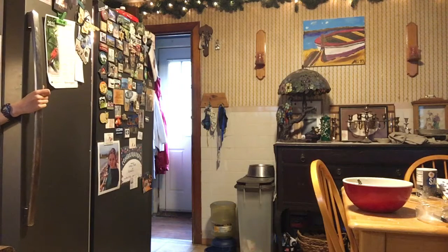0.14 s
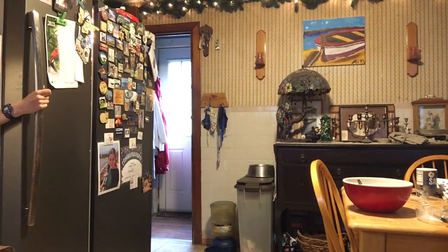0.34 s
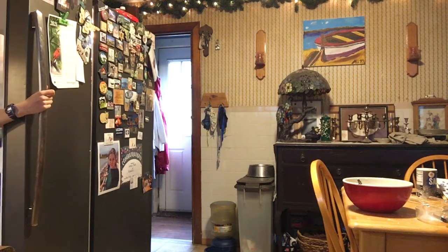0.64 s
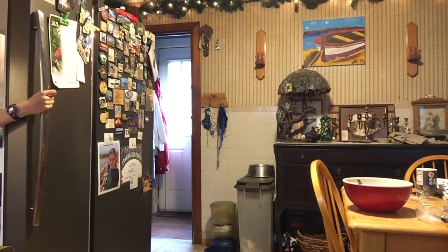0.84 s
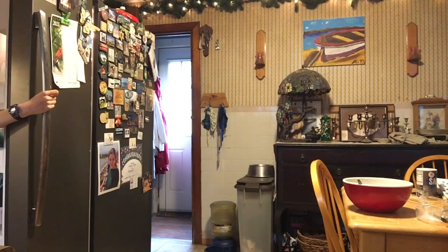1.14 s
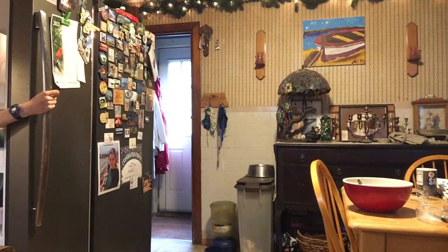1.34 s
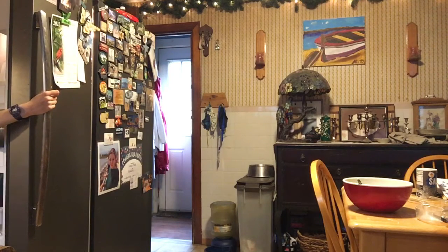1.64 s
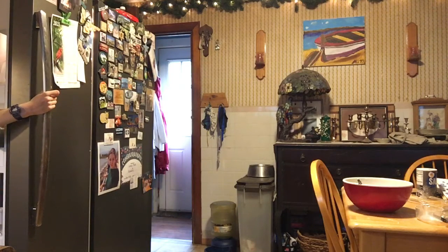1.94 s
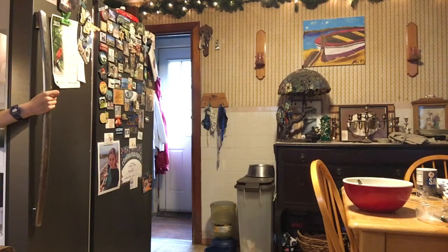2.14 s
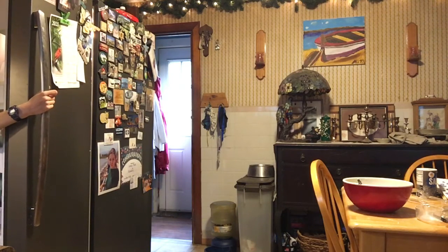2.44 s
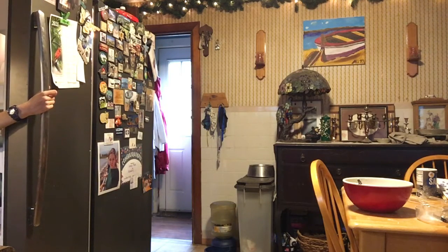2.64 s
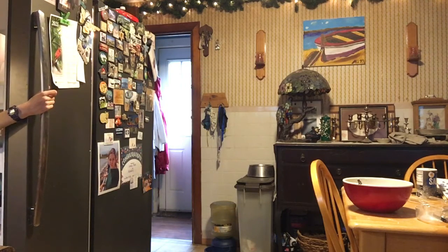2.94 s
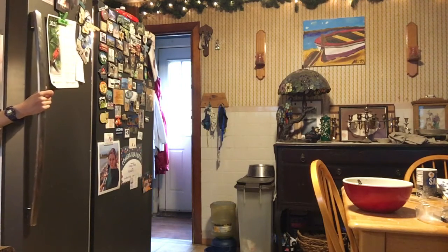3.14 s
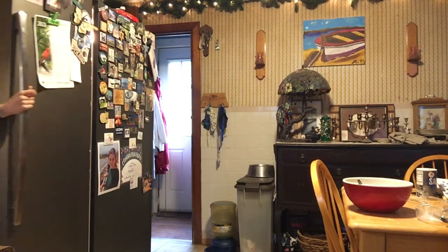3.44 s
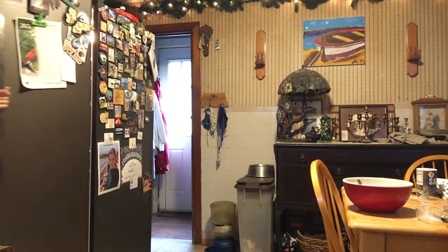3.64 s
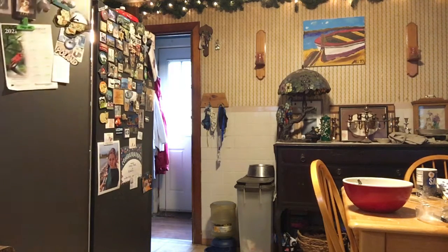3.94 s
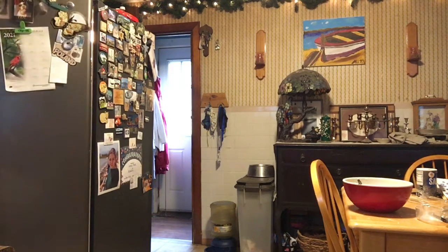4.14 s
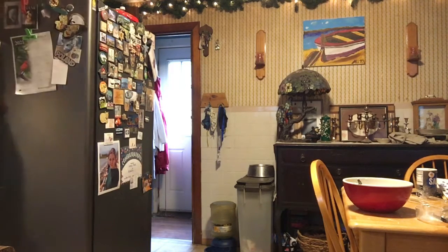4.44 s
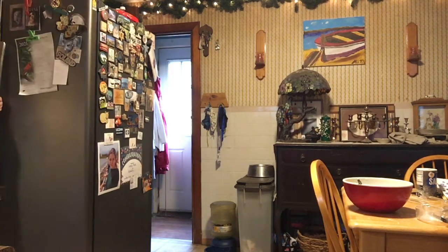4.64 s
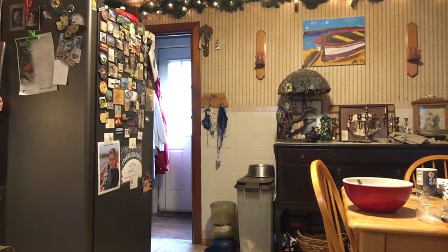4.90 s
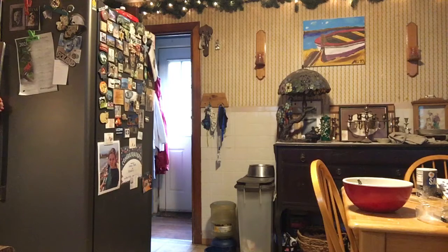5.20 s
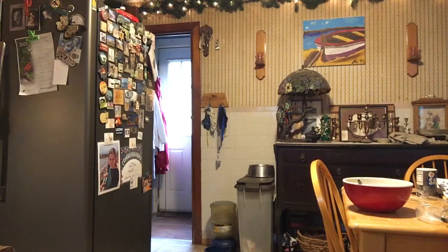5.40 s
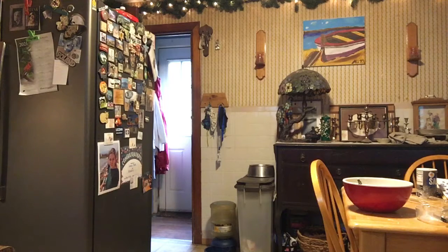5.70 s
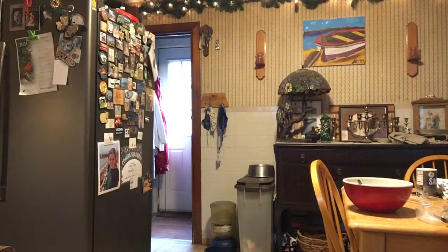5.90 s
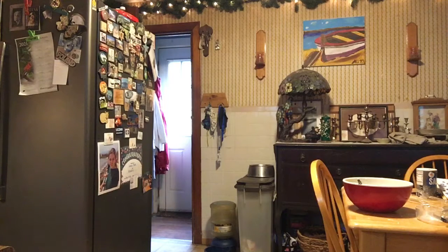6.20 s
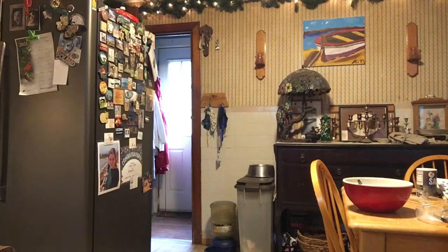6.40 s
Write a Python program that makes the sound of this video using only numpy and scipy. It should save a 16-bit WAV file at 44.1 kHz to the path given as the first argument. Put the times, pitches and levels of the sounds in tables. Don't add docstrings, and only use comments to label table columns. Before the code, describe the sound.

Over a low steady compressor hum, dry hand rubbing and muffled bumps lead to a seal pop, heavy door thumps, and a deep closing thud.

```python
import sys
import numpy as np
from scipy import signal
from scipy.fft import rfft, irfft
from scipy.io import wavfile
from scipy.ndimage import uniform_filter1d, map_coordinates

SR = 44100
rng = np.random.default_rng(int(sys.argv[2]) if len(sys.argv) > 2 else 0)


def magnitude_from_level(level_db):
    exponent = np.asarray(level_db, float) / 20
    return 10 ** exponent


def int16_out(signal):
    q = np.round(np.clip(np.atleast_2d(signal).T, -1, 1) * 32767)
    wavfile.write(sys.argv[1], SR, q.astype(np.int16))


N = 289296


def evened(x):
    return x / np.sqrt(np.mean(x ** 2) + 1e-20)


def filtered(x, order, hz, kind="lowpass"):
    return signal.sosfilt(signal.butter(order, hz, kind, fs=SR, output="sos"), x)


def coloured(x, points):
    f, db = np.transpose(points)
    hz = np.fft.rfftfreq(len(x), 1 / SR)
    gain = magnitude_from_level(np.interp(np.log(hz + 1), np.log(f + 1), db))
    return evened(irfft(rfft(x) * gain, len(x)))


def resonate(x, hz, width_hz):
    return signal.lfilter(*signal.iirpeak(hz, hz / width_hz, SR), x)


def ringing(clicks, hz, width_hz, level_db):
    return magnitude_from_level(level_db) * SR / (2 * np.pi * width_hz) * resonate(clicks, hz, width_hz)


def drift(per_s):
    points = rng.standard_normal(int(N / SR * per_s) + 3)
    coarse = map_coordinates(points, [np.linspace(0, len(points) - 1, N // 32)], order=3)
    return np.interp(np.arange(N), np.linspace(0, N - 1, len(coarse)), evened(coarse))


def modal(x, modes):
    parts = [magnitude_from_level(db + 2 * drift(18)) * evened(resonate(x, hz, width_hz)) for hz, width_hz, db in modes]
    return evened(sum(parts))


def add(mix, start_s, sound):
    part = mix[round(start_s * SR):][:len(sound)]
    part += sound[:len(part)]


# pitch_hz, width_hz, level_db
SKIN_MODES = [(496.5, 6.3, -14), (566.5, 38, 2), (647, 54, 1), (791, 124, 4), (885, 53, -3), (1083, 140, 0),
              (1236, 85, 1), (1364, 68, -12.5), (1527, 57, -4.5), (1736, 190, -2.5), (2050, 130, -24)]
# pitch_hz, width_hz, level_db
PANEL_MODES = [(143.2, 24, 2.5), (171.6, 23.5, 4), (238, 28, 1), (280.6, 9.1, -3.5), (335, 17, -10),
               (374.4, 8.3, -9)]
# pitch_hz, width_hz, level_db
FIZZ_MODES = [(2270, 1150, 0), (2870, 570, 4), (3520, 400, 1.5), (3755, 120, 0.5), (4170, 350, -1),
              (5000, 990, -29)]
# pitch_hz, level_db per Hz
SIZZLE_SPECTRUM = [(2940, -35), (5000, -5), (6710, -0.5), (8460, -6), (9750, -13.5), (10500, -25),
                   (12300, -20), (15500, -33)]


def friction_layers():
    force = magnitude_from_level(1.4 * np.minimum(rng.exponential(1, N), 5))
    slips = force * rng.standard_normal(N) * (rng.random(N) < .3)
    slips = slips / np.sqrt(uniform_filter1d(slips ** 2, size=900) + 1e-9)

    body = evened(filtered(modal(slips, SKIN_MODES) + .5 * evened(slips), 2, [430, 2600], "bandpass"))
    lower = signal.sosfiltfilt(signal.butter(2, 1310, fs=SR, output="sos"), body)
    panel = evened(filtered(modal(slips, PANEL_MODES), 3, [115, 450], "bandpass"))

    fizz_slips = np.roll(slips, -SR) * rng.choice([-1, 1], N)
    fizz = evened(filtered(modal(fizz_slips, FIZZ_MODES), 3, [2100, 5100], "bandpass"))
    sizzle_slips = np.roll(slips, SR) * rng.choice([-1, 1], N)
    sizzle = coloured(sizzle_slips, SIZZLE_SPECTRUM) * magnitude_from_level(0.72 * drift(40))
    return np.array([lower, panel, fizz, sizzle, body - lower])


def effort_db(t, peak_s, level_db, swell_s, fade_s):
    return level_db - 20 * np.where(t < peak_s, (peak_s - t) / swell_s, (t - peak_s) / fade_s)


# fizz_db, sizzle_db, sheen_db.
SLIDE = [(.035, -54.5, .008, 0.24, 7.5), (.13, -57.5, 0.12, 0.09, -8), (.33, -49.5, 0.09, 0.1, -5.5),
         (.39, -48.5, 0.07, 0.04, -5.5), (.24, -57, .03, .2, -5), (.44, -53, 0.069, 0.09, -3),
         (.657, -49.5, 0.0072, 0.34, 0.5), (.86, -52, 0.17, 0.57, -7), (1.062, -49.5, .06, 0.18, -3.5),
         (1.21, -54, 0.13, 0.25, -14), (1.372, -52, 0.18, .1, -3), (1.428, -49, .04, 0.079, 2.5),
         (1.54, -61.5, 0.11, .3, -8), (1.698, -55.5, .12, 0.19, -3)]
SLIDE_COLOUR = (-4, -13, 1)
PRESS = [(.018, -47.5, 0.023, 0.053, 9), (.06, -53.5, .05, 0.056, 9.5), (.128, -54.5, .03, 0.13, -11),
         (.428, -49.5, 0.023, 0.027, -14), (.884, -46.5, .06, 0.12, -18), (1.004, -45, 0.075, 0.028, -6),
         (1.174, -53.5, .1, 0.14, -15), (1.292, -49.5, 0.056, 0.28, -8), (1.512, -57, 0.055, .06, -4),
         (1.6, -63.5, .02, .5, -2), (1.76, -57, 0.033, 0.053, 6), (1.846, -55.5, 0.095, 0.17, -8),
         (1.896, -58.5, 0.044, 0.083, 7)]
PRESS_COLOUR = (-14, -21, -4)
RASP = [
    (.085, -68, .06, .08, -9),
    (.155, -67.5, .06, .08, -9),
    (.21, -71, .01, .1, -9),
    (.31, -67, .08, .1, -9),
    (.355, -64, .06, .06, -9),
    (2.787, -58, .04, .025, -9),
]
RASP_COLOUR = (7, -9, 3)
PULL = [
    (2.378, -55, 0.037, 0.1, 6.5),
    (2.76, -42, 0.028, 0.085, 6),
    (3, -60, 0.087, .2, 1),
    (2.87, -57, 0.083, 0.29, 6.5),
    (4.452, -57, .02, .06, -8),
]
PULL_COLOUR = (-6.5, -19, 1)
CRACK = [
    (2.584, -35, .001, .06, -2),
    (2.603, -37, 0.015, .085, 2),
]
CRACK_COLOUR = (-16, -14, -2)
DOOR = [
    (2.65, -51, .04, 0.08, 9),
    (2.74, -51, 0.026, .03, 5.1),
    (2.946, -50, .15, .2, 3.3),
    (2.995, -52, 0.088, .05, 5),
    (3.012, -33, 0.01, 0.075, 2),
    (3.04, -33, 0.06, 0.068, 6),
    (3.066, -34.5, 0.066, 0.06, 5.3),
    (4.67, -45.5, 0.055, .1, 3.9),
]
DOOR_COLOUR = (-17, -28, -8)
SWING = [(3.45, -62, .05, .06, 7.5), (3.554, -56.5, 0.067, .09, -2), (3.745, -57.5, 0.059, 0.13, -7),
         (3.824, -57.5, .1, 0.053, -10), (4.02, -52, 0.036, 0.032, -9), (4.12, -54.5, 0.16, .05, 0),
         (4.29, -57.5, .04, 0.16, -3.5), (4.454, -46, 0.046, 0.025, -23), (4.47, -56, 0.018, 0.12, 2),
         (4.6, -66, .1, .02, 2), (6.2, -63, .02, .02, 6), (6.408, -65.5, 0.34, .1, -7)]
SWING_COLOUR = (-18.5, -32, -8.5)
SLAM = [
    (4.618, -29.5, .006, .055, -7),
]
SLAM_COLOUR = (-11, -21, -4)
BOUNCE = [
    (4.708, -39.5, 0.014, 0.047, 3.8),
    (4.73, -47.5, .03, 0.032, 5),
    (4.77, -66, .05, .12, 9.9),
    (6.54, -56, .006, .1, 3),
    (6.56, -47, .03, .05, 2),
]
BOUNCE_COLOUR = (-21, -28, -24)


def strokes(layers):
    t = np.arange(0, N / SR + 1e-3, 1e-3)
    power = np.zeros((5, len(t)))
    kinds = [(SLIDE, SLIDE_COLOUR), (PRESS, PRESS_COLOUR), (RASP, RASP_COLOUR), (PULL, PULL_COLOUR),
             (CRACK, CRACK_COLOUR), (DOOR, DOOR_COLOUR), (SWING, SWING_COLOUR), (SLAM, SLAM_COLOUR),
             (BOUNCE, BOUNCE_COLOUR)]
    for rows, (fizz_db, sizzle_db, sheen_db) in kinds:
        for peak_s, level_db, swell_s, fade_s, panel_db in rows:
            effort = magnitude_from_level(effort_db(t, peak_s, level_db, swell_s, fade_s))
            colour = magnitude_from_level(np.array([[0], [panel_db], [fizz_db], [sizzle_db], [sheen_db]]))
            power += (effort * colour) ** 2
    times = np.arange(N) / SR
    return sum(np.interp(times, t, np.sqrt(p)) * layer for p, layer in zip(power, layers))


# peak_s, level_db, swell_s per 20 dB, fade_s per 20 dB, top_db
SCUFFS = [(.028, -66, .004, .1, -16), (.075, -65, .03, .08, -16), (.218, -77, .004, .1, -20),
          (.335, -64, .05, .08, -16), (.378, -60, .04, .06, -12), (.458, -65, .03, .03, -14),
          (.66, -64, .005, .12, -10), (.73, -65, .05, .04, -10), (.777, -68, .005, .05, -6),
          (.82, -63, .04, .03, -12), (.889, -57, .025, .035, -8), (.93, -65, .02, .05, -14),
          (1.07, -62, .02, .09, -6), (1.138, -66, .015, .03, -10), (1.206, -62, .005, .14, -7),
          (1.358, -62, .03, .06, -6), (1.44, -63, .025, .03, -8), (1.596, -66, .003, .07, -12),
          (1.715, -67, .05, .04, -14), (1.535, -69, .04, .05, -16), (1.77, -69, .02, .03, -14),
          (1.85, -67, .03, .05, -14), (2.385, -70, .02, .05, -14), (2.77, -66, .025, .06, -28),
          (2.586, -54.5, .002, .09, -11), (.662, -71, .005, 2.2, -5.5), (.285, -70, .04, .1, -14),
          (4.617, -58, .003, .04, -14), (4.71, -72, .01, .06, -16), (5.501, -72, .002, .02, -14)]


def scuffs(sizzle):
    t = np.arange(0, N / SR + 1e-3, 1e-3)
    top = evened(filtered(sizzle, 4, 9800, "highpass"))
    peak_s, level_db, swell_s, fade_s, top_db = np.transpose(SCUFFS)[..., None]
    effort = effort_db(t, peak_s, level_db, swell_s, fade_s)
    out = np.zeros(N)
    for each_db, layer in ((effort, sizzle), (effort + top_db, top)):
        level = np.sqrt((magnitude_from_level(np.maximum(each_db, -200)) ** 2).sum(0))
        out += np.interp(np.arange(N) / SR, t, level) * layer
    return out


# start_s, level_db, t60_s, panel_db, fizz_db
KNOCKS = [(.022, -53, 0.058, -2, -11), (0.215, -65, 0.083, -11, -1), (.372, -66, 0.041, -9, -3),
          (0.454, -59.5, 0.07, -2, -3), (0.655, -50.5, 0.072, 5, -6), (.780, -58, 0.16, -7, 4),
          (0.875, -45.5, 0.11, -9, -5), (.988, -42.5, 0.065, 2, -16), (1.050, -62, .1, -3, -6),
          (1.195, -56.5, 0.12, -9, -2), (1.351, -51, 0.09, -1, -7), (1.593, -51.5, 0.073, -9, -3.5),
          (1.666, -65, 0.12, -6, -4), (1.828, -58, 0.14, -11, -5.5), (2.585, -42, 0.1, 3, -9),
          (2.690, -57, 0.087, -12, -1), (2.672, -56, .12, -12, -10), (2.935, -51, 0.093, -2, -8.5),
          (3.034, -43, 0.021, 1, -11), (3.057, -40, 0.029, 0, -11), (4.080, -59, 0.13, -15, -11),
          (4.428, -54, 0.07, -8, -24), (4.702, -49, 0.11, 0, -29), (6.371, -60, 0.056, -3, -20),
          (6.532, -45.5, 0.062, -1, -18), (5.5, -57, .04, -10, -12), (6.55, -52, .08, -5, -6)]


def knocks(layers):
    out, t = np.zeros(N), np.arange(SR // 2) / SR
    rise_s = np.array([[.0015], [.006], [.0004], [.0003], [.0008]])
    for start_s, level_db, t60_s, panel_db, fizz_db in KNOCKS:
        part = layers[:, round(start_s * SR):][:, :len(t)]
        u = t[:part.shape[1]]
        rise = 1 - np.exp(-u / rise_s)
        colour = magnitude_from_level(np.array([[0], [panel_db], [fizz_db], [fizz_db - 8], [.5 * fizz_db]]))
        add(out, start_s, (colour * rise * part).sum(0) * magnitude_from_level(level_db - 60 * u / t60_s))
    return out


def gliding_tone(from_hz, to_hz, peak_db, rise_s, t60_s, waver=False):
    t = np.arange(SR) / SR
    hz = to_hz + (from_hz - to_hz) * np.exp(-t / (0.162 * t60_s))
    rise = np.sin(np.pi / 2 * np.minimum(t / rise_s, 1)) ** 2
    shape = rise * magnitude_from_level(-60 * np.maximum(t - rise_s, 0) / t60_s)
    if waver:
        shape = shape * magnitude_from_level(3 * drift(90)[:SR])
        hz = hz * (1 + 12 / to_hz * drift(39)[:SR])
    return -magnitude_from_level(peak_db) * shape * np.sin(2 * np.pi * np.cumsum(hz) / SR)


# start_s, pitch_hz, peak_db,
# rise_s, t60_s
STRUCK_MODES = [(0.0025, 76, -38.5, .013, .15), (0.0156, 161, -46, .0074, 0.26), (0.282, 72.6, -37.5, 0.019, .19),
                (.65, 77, -42, 0.018, .27), (0.884, 83, -36, 0.016, .12), (.994, 88, -33, 0.014, 0.12),
                (1.063, 82, -45, 0.017, .15), (1.341, 92, -39.5, .009, .18), (1.43, 84, -38.5, .019, 0.21),
                (2.373, 85, -33, 0.022, .14), (2.748, 74, -29.5, .0089, .33), (2.95, 98, -32, 0.027, .13),
                (3.015, 85, -22, 0.027, 0.079), (3.069, 88, -34, .015, .33), (3.021, 186, -20.5, 0.0134, 0.046),
                (3.056, 155, -27, 0.015, 0.13), (3.02, 782, -34, .013, 0.16), (3.012, 385, -33, .012, .15),
                (3.05, 480, -35, .01, .12), (.015, 330, -45, .01, .25), (4.425, 700, -52, .006, .08),
                (4.615, 736, -28, .0026, 0.057), (4.615, 185, -24, .0072, 0.2),
                (2.596, 388, -33.5, .01, .24), (2.592, 657, -35.5, .006, .16), (2.586, 899, -39, .005, .3),
         (2.584, 240, -46, .004, .06), (2.583, 990, -38, .001, .04), (3.0, 470, -37, .012, .12),
         (3.055, 894, -38, .015, .2), (3.02, 242, -36, .015, .25), (3.1, 300, -44, .02, .15),
         (4.715, 285, -40, .01, .22), (4.704, 501, -46, .004, .2), (4.704, 689, -47, .004, .12),
         (4.62, 900, -36, .008, .15), (4.616, 510, -36, .005, .15), (.02, 520, -48, .008, .15),
         (.04, 660, -52, .01, .15), (6.534, 760, -48, .002, .1), (6.536, 380, -50, .004, .15),
         (1.352, 170, -40, .01, .12), (.862, 547, -45, .015, .2), (.9, 620, -47, .02, .15),
         (1.715, 165, -46, .01, .12), (1.06, 175, -45, .01, .15), (2.79, 165, -33, .012, .12),
         (1.6, 155, -49, .02, .15), (.34, 620, -51, .02, .2), (.355, 745, -46, .02, .15),
         (2.755, 350, -36, .015, .2), (4.705, 409, -39, .006, .28), (.03, 300, -46, .015, .15),
         (4.432, 560, -50, .004, .1)]


def thumps_and_rings():
    out = np.zeros(N)
    for start_s, hz, peak_db, rise_s, t60_s in STRUCK_MODES:
        add(out, start_s, gliding_tone(1.04 * hz, hz, peak_db, rise_s, t60_s))
    return out


# start_s, from_hz, to_hz, peak_db, t60_s
POPS = [
    (2.585, 820, 303, -35, 0.101),
    (4.6135, 73, 62, -15, 0.16),
    (4.703, 420, 310, -30, 0.064),
    (4.618, 405, 600, -30, 0.12),
]
# start_s, from_hz, to_hz, peak_db, t60_s
SQUEAKS = [(2.584, 1455, 1445, -39, 0.091), (2.75, 1486, 1276, -49, .2), (4.085, 3900, 3780, -64, .071),
           (4.303, 1870, 1920, -60, .1), (4.33, 1990, 1930, -63, .08), (.13, 1262, 1250, -48, 0.081),
           (5.37, 6985, 6990, -77, .6), (5.43, 6975, 6970, -71, .45), (4.704, 1200, 1185, -45, .14),
           (3.008, 1550, 1535, -44, .1), (3.052, 1550, 1540, -44, .12), (3.02, 1285, 1280, -45, .18),
           (4.708, 3770, 3765, -63, .13), (1.43, 4600, 4500, -58, .12), (2.583, 3900, 3850, -52, .1)]


def pops_and_squeaks():
    out = np.zeros(N)
    for start_s, from_hz, to_hz, peak_db, t60_s in POPS:
        add(out, start_s, gliding_tone(from_hz, to_hz, peak_db, 0.047 * t60_s, t60_s))
    for start_s, from_hz, to_hz, peak_db, t60_s in SQUEAKS:
        add(out, start_s, gliding_tone(from_hz, to_hz, peak_db, 0.063 * t60_s, t60_s, waver=True))
    return out


def kitchen(x):
    low_t60_s, high_t60_s = 0.28, 1.76 * 0.28
    taps = np.zeros(SR // 2)
    at = np.arange(200, len(taps) - 20, 20)
    taps[at + rng.integers(0, 20, len(at))] = rng.choice([-1., 1.], len(at))
    t = np.arange(len(taps)) / SR
    low = filtered(taps, 2, 2000)
    tail = low * magnitude_from_level(-60 * t / low_t60_s) + (taps - low) * magnitude_from_level(-60 * t / high_t60_s)
    return signal.fftconvolve(x, tail / np.linalg.norm(tail))[:N]


# time_s, level_db
HUM = [(0.1, -43), (0.73, -43.6), (1.26, -42.5), (1.6, -43.5), (2.11, -42.5), (2.54, -44), (3.352, -43),
       (3.68, -44.5), (3.78, -43), (4.506, -43), (4.544, -47), (4.58, -44.5), (4.82, -45.5), (4.896, -43),
       (5.158, -42.5), (5.314, -44.5), (5.382, -43), (6.4, -42.5)]
# multiple, level_db
OVERTONES = [(2, -76.5), (3, -70), (4, -70.5), (6, -77.5), (19, -81), (20, -81.5), (21, -74.5), (22, -88.5)]
# time_s, level_db
WHINE = [(0, 4.5), (2, 3), (3.4, 1.5), (4, 1), (4.5, -2.5), (5.5, -3), (6.56, -4)]


def compressor():
    shaft_hz, start_turn = 58.977, -.165
    t = np.arange(N) / SR
    phase = 2 * np.pi * (shaft_hz * t + start_turn) + 0.075 * drift(8)
    out = magnitude_from_level(np.interp(t, *np.transpose(HUM))) * np.sin(phase)
    whine_db = np.interp(t, *np.transpose(WHINE))
    for multiple, level_db in OVERTONES:
        level = magnitude_from_level(level_db + whine_db * (multiple > 10) + 2 * drift(12))
        out += level * np.sin(round(multiple) * phase + rng.uniform(0, 2 * np.pi))
    return np.sqrt(2) * out


# pitch_hz, width_hz, level_db
GRILLE = [(2100, 700, -54.5), (1690, 220, -60)]


def grille_rattle():
    taps_per_s, first_s, stray_per_s = 9.72, .003, 25
    steady = np.zeros(N)
    at = np.round(np.arange(first_s, N / SR - 1e-3, 1 / taps_per_s) * SR).astype(int)
    steady[at] = magnitude_from_level(3 * rng.standard_normal(len(at)))
    stray = (rng.random(N) < stray_per_s / SR) * magnitude_from_level(2 * rng.standard_normal(N))
    return sum(ringing(taps, *mode) for taps, mode in zip((steady, stray), GRILLE))


# pitch_hz, level_db per Hz
AIR_SPECTRUM = [(30, -19), (48, -11.5), (90, 2), (130, -10.5), (250, -4.5), (430, -18.5), (860, -17),
                (984, -22.5), (1210, -24), (1350, -25.5), (2320, -31), (5610, -35.5), (10300, -44),
                (15500, -45)]


def air():
    noise = coloured(rng.standard_normal(N), AIR_SPECTRUM)
    low = filtered(noise, 2, 2500)
    return magnitude_from_level(-58) * (noise + low * (magnitude_from_level(1.3 * drift(20)) - 1))


# pitch_hz, width_hz, level_db
TICK_MODES = [(7070, 700, -55.5), (8250, 1500, -57.5), (3600, 2800, -70), (5900, 1200, -66)]


def frame_ticks():
    frame_hz, first_s, slip_s = 29.993, .0008, .0015
    clicks = np.zeros(N)
    start_s = np.arange(first_s, N / SR, 1 / frame_hz)
    at = np.round((start_s + slip_s * rng.random(len(start_s))) * SR).astype(int)
    at = at[at < N]
    clicks[at] = magnitude_from_level(1.5 * rng.standard_normal(len(at)))
    out = np.zeros(N)
    for k, (hz, width_hz, level_db) in enumerate(TICK_MODES):
        softened = resonate(clicks, hz, 3 * width_hz)
        out += (-1) ** k * ringing(softened, hz, width_hz, level_db)
    return out


def scene():
    layers = friction_layers()
    hits = knocks(layers)
    rub = strokes(layers) + scuffs(np.roll(layers[3], SR // 3))
    room = magnitude_from_level(-3.5) * kitchen(hits + magnitude_from_level(-17.5) * rub)
    door = rub + hits + thumps_and_rings() + pops_and_squeaks() + room
    door = signal.sosfiltfilt(signal.butter(2, 27, "highpass", fs=SR, output="sos"), door)
    return (door + compressor() + grille_rattle() + air())[None]


def low_pass(x):
    return signal.sosfilt(signal.butter(12, 15710, fs=SR, output="sos"), x)


def record(dry):
    heard = filtered(dry, 2, 30, "highpass")
    return low_pass(heard + frame_ticks())


dry = scene()
out = record(dry)
int16_out(out)
```